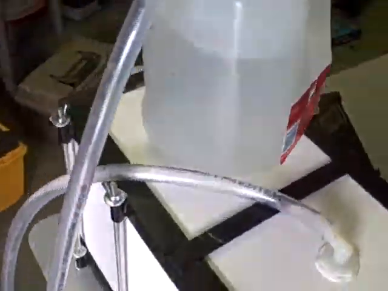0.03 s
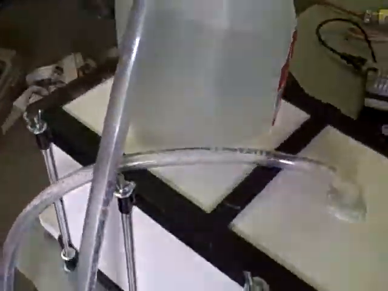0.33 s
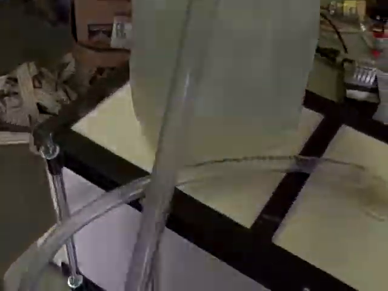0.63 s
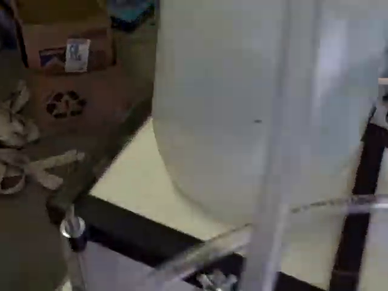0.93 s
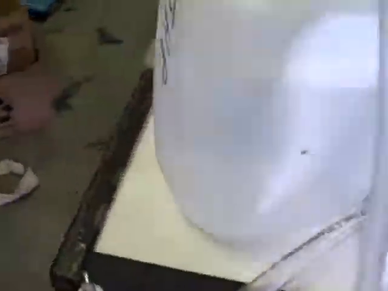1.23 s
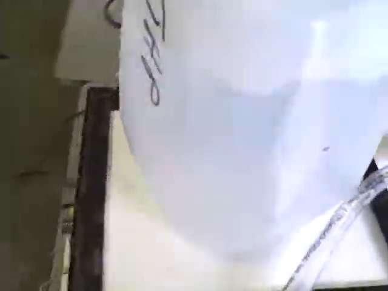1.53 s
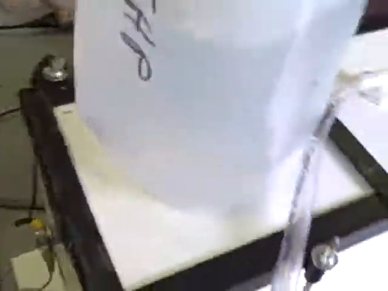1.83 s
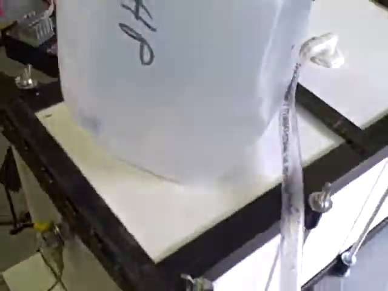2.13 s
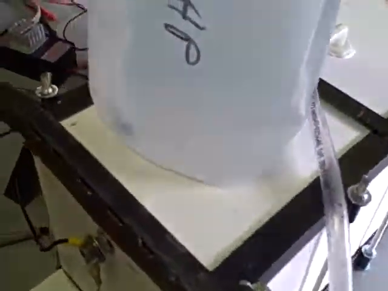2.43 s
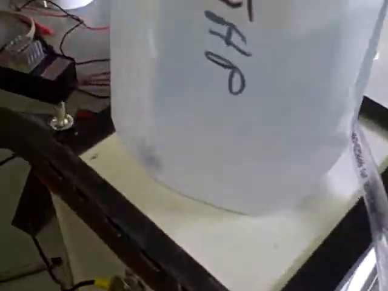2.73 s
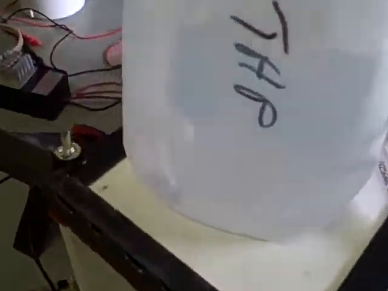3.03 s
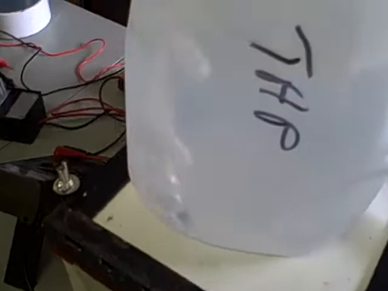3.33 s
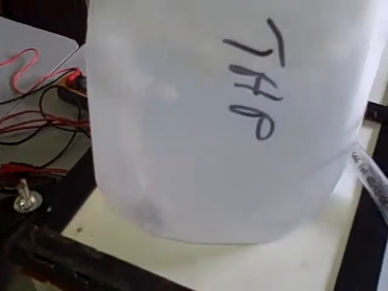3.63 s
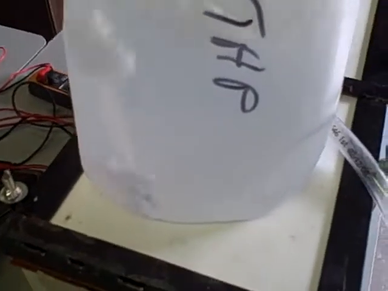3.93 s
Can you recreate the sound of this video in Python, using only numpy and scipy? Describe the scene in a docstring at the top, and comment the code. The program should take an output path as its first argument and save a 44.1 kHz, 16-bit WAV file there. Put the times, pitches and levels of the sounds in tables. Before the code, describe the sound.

Gas bubbling through water in a plastic jug, with hollow glugs and crackling pops.

```python
"""Gas bubbles through water in a plastic jug, heard from close by in a small workshop.
From the start, over room rumble, hiss and a thin electrical whine, glugs set the air in the jug booming
and small bubbles simmer and fizz. Big bubbles follow, each ringing briefly and dragging smaller ones
after it, while films burst in ticks and sharp pops. Near 1 s gas squeaks faintly through a narrow gap.
From 1.7 s the simmer and fizz grow with the gas flow, and foam collapses now and then in splashes."""
import sys
import numpy as np
from scipy import signal
from scipy.fft import rfft, irfft
from scipy.io import wavfile
from scipy.ndimage import uniform_filter1d

SR = 44100
rng = np.random.default_rng(int(sys.argv[2]) if len(sys.argv) > 2 else 0)


def int16_out(signal):
    """Quantize to a 16-bit WAV file."""
    q = np.round(np.clip(np.atleast_2d(signal).T, -1, 1) * 32767)
    wavfile.write(sys.argv[1], SR, q.astype(np.int16))


N = 176400

# spectrum of the room noise (frequency [Hz], relative level [dB])
ROOM_SPECTRUM = [(20, 5.5), (50, -0.5), (100, 2), (300, -3), (600, -3.5), (1000, -14), (4000, -24.5),
                 (15500, -32)]
# envelope of the treble hiss (time [s], level [dB])
HISS_ENVELOPE = [(0, -71), (.25, -60.5), (.34, -72), (.6, -72), (.85, -67.5), (.96, -65.5), (1.13, -75),
                 (1.22, -66), (1.38, -65), (1.47, -68.5), (2.3, -78), (2.42, -63.5), (2.53, -78), (4, -85)]
# modes of the air in the jug (frequency [Hz], bandwidth [Hz], relative gain [dB])
AIR_MODES = [(227.8, 11.8, 4), (272, 61, -10.5)]
# glugs that excite that air (time [s], level [dB])
GLUGS = [(0, -49), (.11, -48.5), (.225, -48.5), (.435, -43), (.66, -47), (.73, -46), (.985, -45),
         (1.17, -48), (1.245, -43.5), (1.36, -49), (1.451, -43), (1.49, -44.5), (1.575, -47.5),
         (1.75, -47.5), (1.82, -42), (2.145, -53), (2.27, -49), (2.335, -53), (2.38, -55), (2.596, -43),
         (2.795, -43), (2.85, -52), (2.945, -46.5), (3.11, -47), (3.215, -46), (3.29, -44), (3.42, -46),
         (3.465, -44.5), (3.519, -44), (3.613, -47), (3.74, -51), (3.8, -42.5), (3.89, -49), (3.975, -45)]
# strength of the gas flow (time [s], relative level [dB])
GAS_FLOW = [(0, -6), (1.7, -6), (4, 0.5)]
# big bubbles (time [s], relative level [dB], frequency [Hz], time that gas feeds the ring [s])
BIG_BUBBLES = [(.091, -46.5, 660, 0.0043), (.248, -43.5, 586, 0.0053), (.348, -45.5, 676, 0.0069),
               (.435, -48.5, 424, 0.0048), (.731, -46.5, 672, 0.0078), (.814, -52, 515, 0.0044),
               (.818, -50, 747, 0.0046), (.868, -43.5, 730, 0.0044), (.985, -44, 740, 0.0052),
               (1.088, -51, 690, 0.0025), (1.249, -44, 430, 0.0065), (1.282, -43, 720, 0.0055),
               (1.341, -43.5, 707, 0.0067), (1.372, -52, 668, 0.009), (1.441, -38.5, 710, 0.0028),
               (1.462, -44.5, 271.6, 0.043), (1.579, -44, 610, .002), (1.641, -43, 600, 0.0014),
               (1.664, -41, 453, 0.0055), (1.682, -45.5, 626, 0.0054), (1.744, -44.5, 660, 0.0023),
               (1.766, -38.5, 613, 0.0032), (1.817, -43, 610, .002), (1.833, -37, 726, .003),
               (1.866, -44, 744, .002), (1.909, -38, 640, 0.0037), (1.937, -37, 377, 0.0018),
               (2.017, -44.5, 603, 0.0099), (2.089, -44.5, 470, .003), (2.157, -42, 456, .007),
               (2.165, -44, 780, 0.0047), (2.258, -43, 602, 0.0055), (2.314, -40, 450, 0.0038),
               (2.396, -41.5, 424, 0.0025), (2.46, -48.5, 636, 0.03), (2.493, -45, 452, 0.0072),
               (2.559, -48.5, 680, 0.0072), (2.598, -43.5, 610, 0.0035), (2.7, -47.5, 493, 0.0036),
               (2.768, -51, 715, 0.011), (2.786, -41, 620, .006), (2.837, -42, 458, 0.0028),
               (2.869, -41.5, 650, 0.0077), (2.937, -38.5, 613, 0.0165), (2.996, -44, 620, 0.0035),
               (3.025, -55, 424, 0.01), (3.101, -44, 663, .001), (3.123, -47, 473, 0.0073),
               (3.143, -45.5, 616, 0.0022), (3.2, -42.5, 700, 0.0047), (3.213, -43, 580, 0.0029),
               (3.232, -46, 375, 0.0089), (3.292, -43.5, 640, 0.0089), (3.31, -52, 416, 0.0025),
               (3.383, -33, 497, 0.0043), (3.381, -36, 680, 0.0053), (3.404, -38, 527, .004),
               (3.435, -43, 670, 0.0051), (3.454, -39, 483, 0.0053), (3.53, -46.5, 382, 0.0078),
               (3.587, -44, 578, 0.0075), (3.62, -42.5, 262, 0.019), (3.804, -39.5, 602, 0.0069),
               (3.842, -44.5, 598, 0.0032), (3.965, -44, 873, 0.0071), (3.972, -43, 480, 0.005)]
# small bubbles bursting at the surface (time [s], relative level [dB], frequency [Hz])
SURFACE_TICKS = [(0.121, -50.5, 8200), (0.132, -53, 3300), (0.145, -51, 3250), (0.269, -54, 2800),
                 (0.676, -51.5, 1640), (0.691, -53, 10500), (0.918, -53, 5400), (1.001, -54.5, 5250),
                 (1.182, -53, 3920), (1.287, -53.5, 1290), (1.435, -52, 6600), (1.574, -53, 1830),
                 (1.641, -55, 8200), (1.742, -50.5, 4570), (1.866, -51, 3640), (1.903, -54, 3400),
                 (2.126, -50.5, 5860), (2.136, -56, 9220), (2.141, -51.5, 3960), (2.175, -49.5, 5440),
                 (2.237, -53.5, 2920), (2.359, -54, 5000), (2.412, -50.5, 3150), (2.625, -54, 2410),
                 (2.649, -56, 6400), (2.706, -56.5, 1380), (2.77, -54.5, 4600), (2.831, -49.5, 7500),
                 (2.852, -55, 1680), (2.897, -54, 1510), (2.934, -54, 1170), (2.953, -49.5, 3120),
                 (3.103, -52, 2190), (3.12, -52, 8310), (3.144, -56, 8800), (3.185, -58, 6980),
                 (3.376, -50.5, 2030), (3.401, -49, 9150), (3.462, -53.5, 11100), (3.557, -52, 2000),
                 (3.571, -53.5, 10400), (3.815, -53, 9500), (3.883, -55, 5700), (3.942, -56, 9100),
                 (3.987, -53, 11300)]
# bursting films (time [s], relative level [dB], centre frequency [Hz], spread [octaves])
FILM_POPS = [(0.2227, -46, 5950, 0.92), (0.2492, -45.5, 4830, 0.92), (0.3757, -46.5, 4600, 0.81),
             (0.4392, -48, 3250, 0.84), (0.4725, -36.5, 2050, 0.32), (0.5634, -53.5, 5500, 0.35),
             (0.645, -51.5, 6100, 0.83), (0.936, -51, 3730, 1.2), (1.0286, -50.5, 5500, 1.3),
             (1.0398, -48.5, 6000, 0.19), (1.1984, -52, 4240, 0.11), (1.271, -52.5, 5660, 0.81),
             (1.2937, -49, 2920, 0.38), (1.3734, -45.5, 5200, 0.69), (1.4635, -49.5, 3210, 0.11),
             (1.4977, -42, 4280, 1.34), (1.5076, -49.5, 6530, 0.96), (1.5308, -47, 6200, 1.03),
             (1.578, -53.5, 5200, 0.13), (1.5897, -44, 4770, 1.34), (1.671, -54.5, 1640, 0.097),
             (1.6804, -51.5, 5360, 0.45), (1.7466, -45.5, 3260, 0.086), (1.8363, -48, 1510, 0.38),
             (1.8473, -38, 2130, 0.36), (1.9426, -54, 1840, 0.54), (2.036, -53, 3440, 0.49),
             (2.1068, -49.5, 5130, 1.05), (2.208, -49.5, 4770, 0.67), (2.28, -48.5, 9360, 0.18),
             (2.3642, -52.5, 2250, 0.08), (2.4862, -46, 3820, 0.085), (2.487, -48, 1880, 0.078),
             (2.5897, -43.5, 2750, 0.067), (2.8, -40.5, 2500, 0.34), (2.8384, -43, 1700, 0.67),
             (3.1526, -44.5, 4330, 0.14), (3.2334, -52.5, 1890, 0.079), (3.2888, -48, 7300, 1.05),
             (3.3603, -44.5, 9300, 0.11), (3.3834, -45.5, 10050, 0.36), (3.4174, -51, 1670, 0.15),
             (3.428, -36, 2344, 0.18), (3.525, -49.5, 4070, 0.56), (3.5864, -44.5, 2210, 0.22),
             (3.6305, -54, 3920, 1.2), (3.6396, -38, 2370, 0.78), (3.7403, -40, 5140, 0.22),
             (3.757, -48, 10340, 0.21), (3.791, -49, 2720, 1.1), (3.8393, -38, 4720, 0.83),
             (3.9467, -44.5, 1670, 0.97)]
# whistle of gas in a narrow gap (time [s], frequency [Hz], level [dB])
GAP_WHISTLE = [(0.859, 4300, -77), (.925, 4480, -63), (.982, 4290, -65), (1.0, 4000, -77)]
# collapses of foam (time [s], relative level [dB], centre frequency [Hz])
FOAM_SPLASHES = [(1.842, -39.5, 1140), (1.942, -44.5, 930), (2.019, -39.5, 1085), (2.841, -49, 1310),
                 (3.381, -43.5, 864), (3.432, -51, 1740), (3.645, -45, 1390), (3.837, -39, 1840),
                 (3.943, -43, 1290)]
# reflections off the jug and the bench (delay [s], gain [dB])
REFLECTIONS = [(.00135, -20), (.0029, -21)]
# response of the plastic wall (frequency [Hz], gain [dB])
WALL_RESPONSE = [(1000, 0.5), (1650, 1), (2500, -2.5), (3200, -5), (4800, -1), (9500, 1), (14000, -2.5)]


def undb(db):
    """Decibels to amplitude ratio."""
    return 10 ** (np.asarray(db) / 20)


def unit(x):
    """Normalisation to rms 1."""
    return x / np.sqrt(np.mean(x ** 2) + 1e-30)


def curve(table):
    """Linear interpolation of (time, value) points."""
    return np.interp(np.arange(N) / SR, *np.array(table).T)


def add(out, start, x):
    """Superposition of x on out from a start time in seconds."""
    i = int(np.clip(start * SR, 0, N - 1))
    out[i:i + len(x)] += x[:N - i]


def shape(x, gain):
    """Linear filtering: the spectrum is multiplied by gain(frequency)."""
    return irfft(rfft(x) * gain(np.maximum(np.fft.rfftfreq(len(x), 1 / SR), 1)), len(x))


def noise(gain, size=N):
    """White noise filtered by gain(frequency)."""
    return shape(rng.standard_normal(size), gain)


def response(f, table):
    """Gain interpolated between (frequency, level) points on logarithmic axes."""
    hz, db = np.array(table).T
    return undb(np.interp(np.log(f), np.log(hz), db))


def resonance(f, hz, width_hz):
    """Complex response of a second-order resonator."""
    return 1 / (1 + 1j * (f * f - hz * hz) / (f * width_hz))


def ring(hz, rise_s, decay_s, glide_per_s=0, hold_s=0):
    """Damped oscillation of a bubble: it swells, holds while gas feeds it, then decays exponentially."""
    t = np.arange(int((rise_s + hold_s + 7 * decay_s) * SR)) / SR
    swell = np.sin(np.minimum(t / rise_s, 1) * np.pi / 2) ** 2
    decay = np.exp(-np.maximum(t - rise_s - hold_s, 0) / decay_s)
    return swell * decay * np.sin(2 * np.pi * hz * t * (1 + glide_per_s * t / 2))


def room_rumble(db=-54):
    """Stationary noise, strongest at low frequencies."""
    return undb(db) * unit(noise(lambda f: response(f, ROOM_SPECTRUM)))


def electrical_whine(db=-65, hz=15735, width_hz=24):
    """Narrow-band noise is heard as a tone whose amplitude fluctuates at random."""
    return undb(db) * unit(noise(lambda f: resonance(f, hz, width_hz) ** 2))


def hiss(hz=5700):
    """Amplitude modulation: a broad band of faint treble noise swells now and then."""
    return unit(noise(lambda f: resonance(f, hz, 2 * hz))) * undb(curve(HISS_ENVELOPE))


def air_boom(rise_s=.012, decay_s=.056, floor_db=-57.5):
    """Cavity resonance: each glug excites the air in the jug, and the decaying responses add in power."""
    modes = lambda f: sum(undb(db) * resonance(f, hz, width) for hz, width, db in AIR_MODES)
    air = noise(lambda f: modes(f) * np.abs(resonance(f, hz=242, width_hz=117)))
    air /= np.sqrt(uniform_filter1d(air ** 2, size=1500) + 1e-18)  # the glugs alone set the level
    power = undb(floor_db) ** 2
    for start, db in GLUGS:
        age = np.maximum(np.arange(N) / SR - start, 0)
        envelope = np.minimum(age / rise_s, 1) * np.exp(-np.maximum(age - rise_s, 0) / decay_s)
        power = power + (undb(db) * envelope) ** 2
    return air * np.sqrt(power)


def bubble_swarm(count, low_hz, high_hz, decay_cycles, scatter_db):
    """Incoherent superposition: small bubbles ring at random times, louder when more gas flows."""
    out = np.zeros(N)
    for when, pitch, strength in rng.random((count, 3)):
        hz = low_hz * (high_hz / low_hz) ** pitch
        db = scatter_db * min(-np.log(1 - strength), np.pi)  # capped exponential distribution
        add(out, when * N / SR, undb(db) * ring(hz, .54 / hz, decay_cycles / hz))
    return out * undb(curve(GAS_FLOW))


def gurgle(count=9, trail_s=.036, trail_hz=574, spread_oct=1.35, fall_oct_per_s=11.1, splash_s=.018):
    """Bubble resonance: each big bubble rings, with a falling trail of brief ones and a light splash."""
    out = np.zeros(N)
    for start, db, hz, feed_s in BIG_BUBBLES:
        bubble = ring(hz, rise_s=.002, decay_s=.0021, glide_per_s=-2, hold_s=feed_s)
        add(out, start, undb(db + 1.5) * bubble)
        for k, (jitter, when, trail_pitch, splash_pitch) in enumerate(rng.random((count, 4))):
            progress = (k + jitter) / count
            delay = trail_s * progress
            octaves = spread_oct * (trail_pitch - .5) - fall_oct_per_s * delay
            follower_hz = np.sqrt(hz * trail_hz) * 2 ** octaves
            follower = ring(follower_hz, .0015, 1.8 / follower_hz)
            add(out, start + delay, undb(db - 4.5 - 3 * progress) * follower)
            splash_hz = 1135 * 2 ** (1.34 * (splash_pitch - .5))
            add(out, start + splash_s * when, undb(db - 14) * ring(splash_hz, .00048, 1.5 / splash_hz))
    return out


def crackle(count=10, span_s=.04, low_hz=1470, high_hz=10240):
    """Impulsive excitation: each big bubble breaks the surface and sets off a cluster of tiny bursts."""
    out = np.zeros(N)
    for start, db, _, _ in BIG_BUBBLES:
        for when, pitch, weakness in rng.random((count, 3)):
            hz = low_hz * (high_hz / low_hz) ** pitch
            add(out, start + span_s * when, undb(db - 8.5 - 31 * weakness) * ring(hz, .5 / hz, 2.8 / hz))
    return out


def ticks(size=1024, crack_s=.002):
    """Free decay: a small bubble bursts with a broadband crack and rings for a few cycles."""
    out, t = np.zeros(N), np.arange(size) / SR
    for start, db, hz in SURFACE_TICKS:
        add(out, start, undb(db + 10.5) * ring(hz, rise_s=.00012, decay_s=4.7 / (hz + 2000)))
        crack = unit(noise(lambda f: resonance(f, hz, hz), size))
        add(out, start, undb(db + .5) * crack * np.exp(-t / crack_s))
    return out


def pops(size=4096, tear_s=.00046, rise_s=.00036, crack_s=.0023, ring_s=.0035, spray_s=.0076):
    """Film rupture: a tear grows to a crack, the bubble beneath resonates, and a duller spray follows."""
    out, t = np.zeros(N), (np.arange(size) - 256) / SR  # the tear begins before t = 0
    age = np.maximum(t, 0)
    attack = 1 - np.exp(-age / rise_s)
    crack_envelope = attack * np.exp(-age / crack_s) + undb(-1.5) * np.exp(-np.abs(t) / tear_s)
    spray_envelope = attack * undb(-2) * np.exp(-age / spray_s)
    for start, db, hz, spread in FILM_POPS:
        spread = max(spread, .1)
        peak = lambda f: np.exp(-(np.log2(f / hz) / spread / 2) ** 2)
        band = lambda f: (peak(f) + undb(-11.5) * np.abs(resonance(f, hz, 2 * hz))) / np.sqrt(f)
        crack = crack_envelope * noise(band, size)
        spray = spray_envelope * noise(lambda f: band(f) / np.hypot(1, f / 3000), size)
        tone = unit(attack * np.sin(2 * np.pi * hz * age) * np.exp(-age / ring_s))
        burst = unit(crack + spray) + .13 / spread * tone  # narrow-band pops ring the most
        add(out, start + t[0], undb(db - 10.56) * unit(burst))
    return out


def squeak(flutter_hz=130, flutter_rad=1.9):
    """Flow tone: gas in a narrow gap whistles, rising and sagging; phase modulation makes it airy."""
    when, hz, db = np.array(GAP_WHISTLE).T
    t = np.arange(N) / SR
    phase = 2 * np.pi * np.cumsum(np.interp(t, when, hz)) / SR
    flutter = unit(noise(lambda f: 1 / (1 + (f / flutter_hz) ** 2)))
    tone = unit(np.sin(phase + flutter_rad * flutter))
    return tone * undb(np.interp(t, when, db)) * (t > when[0]) * (t < when[-1])


def foam_splashes(count=9, span_s=.018, fade_db=8.7):
    """Superposed transients: foam collapses in a quick, fading run of small ringing bubbles."""
    out = np.zeros(N)
    for start, db, centre_hz in FOAM_SPLASHES:
        for k, (jitter, pitch) in enumerate(rng.random((count, 2))):
            progress = (k + jitter) / count
            hz = centre_hz * 2 ** (pitch - .5)
            add(out, start + span_s * progress, undb(db - fade_db * progress) * ring(hz, .00083, 2 / hz))
    return out


def early_echoes(x):
    """Comb filtering: reflections from nearby surfaces interfere with the direct sound."""
    out = x.copy()
    for delay, db in REFLECTIONS:
        add(out, delay, undb(db) * x)
    return out


def through_wall(x):
    """Frequency-dependent transmission: the jug's wall colours what bursts inside."""
    return shape(x, lambda f: response(f, WALL_RESPONSE))


def workshop_reverb(x, size=16384, t60_s=.16, cutoff_hz=2200):
    """Reverberation: bench and clutter return a short, dull, exponentially decaying tail."""
    t = np.arange(size) / SR
    scatter = noise(lambda f: 1 / np.hypot(1, f / cutoff_hz), size)
    envelope = undb(-60 * t / t60_s) * (t > .003)
    impulse_response = scatter * envelope / np.sqrt(np.sum(envelope ** 2))
    return x + undb(-9) * signal.fftconvolve(x, impulse_response)[:N]


def scene():
    """Superposition of the bubbling jug and the room's noise in one channel."""
    simmer = undb(-48) * bubble_swarm(220, low_hz=247.5, high_hz=804, decay_cycles=1.9, scatter_db=3)
    fizz = undb(-64.5) * bubble_swarm(1000, low_hz=1173, high_hz=12800, decay_cycles=7.1, scatter_db=6)
    bursts = through_wall(early_echoes(pops() + ticks() + crackle() + fizz))
    water = workshop_reverb(gurgle() + foam_splashes() + simmer + bursts)
    return (water + air_boom() + squeak() + hiss() + room_rumble() + electrical_whine())[None]


def record(dry):
    """Band limiting: a steep low-pass filter cuts the treble above 15.9 kHz."""
    return signal.sosfilt(signal.ellip(10, .1, 70, 15900, fs=SR, output="sos"), dry)


dry = scene()
out = record(dry)
int16_out(out)
```